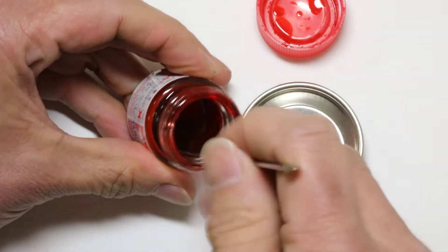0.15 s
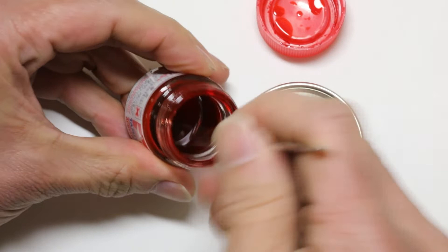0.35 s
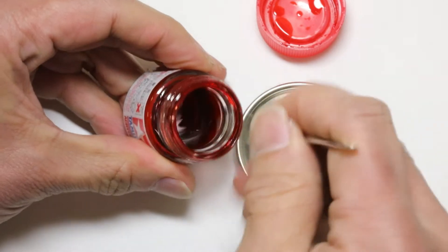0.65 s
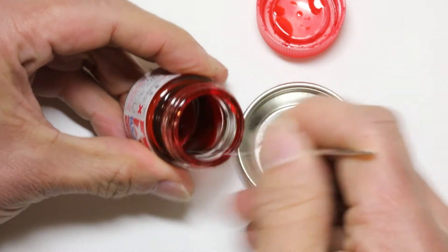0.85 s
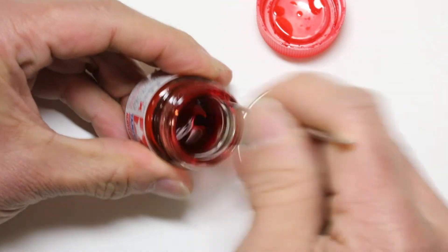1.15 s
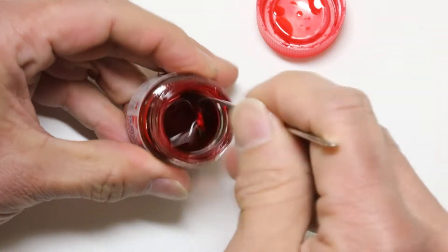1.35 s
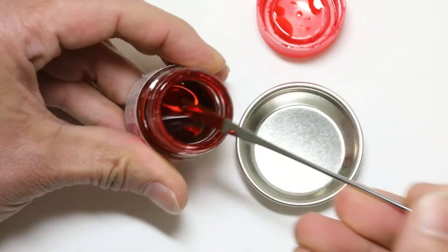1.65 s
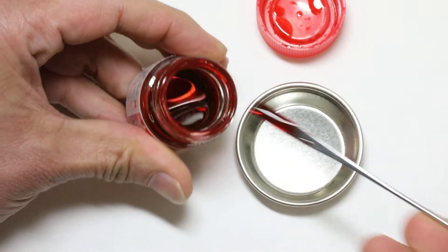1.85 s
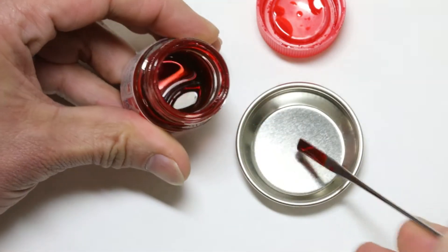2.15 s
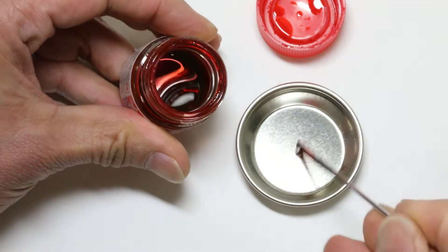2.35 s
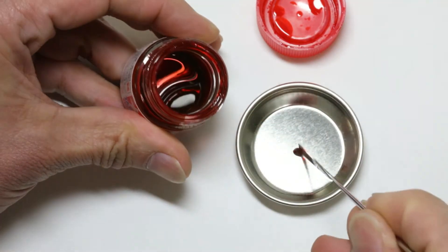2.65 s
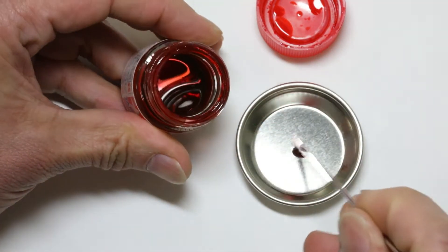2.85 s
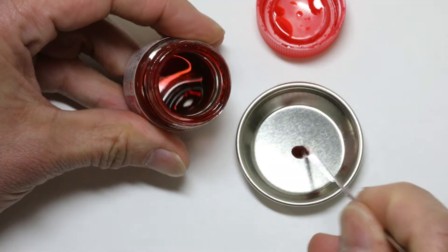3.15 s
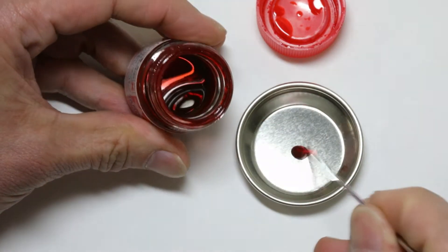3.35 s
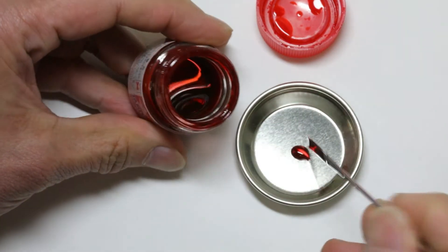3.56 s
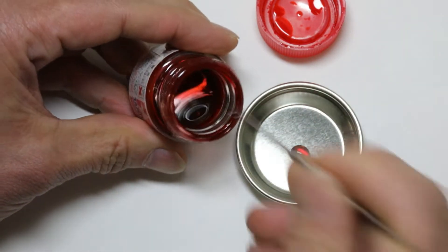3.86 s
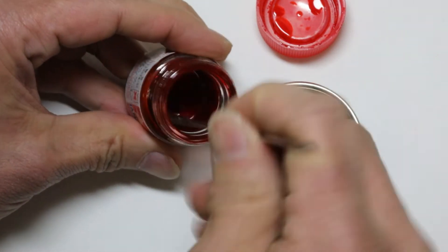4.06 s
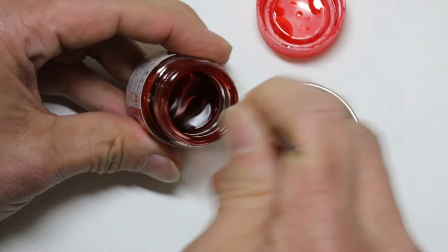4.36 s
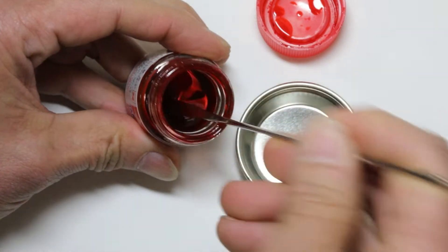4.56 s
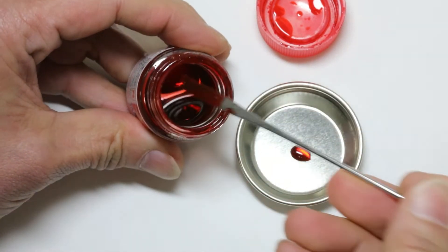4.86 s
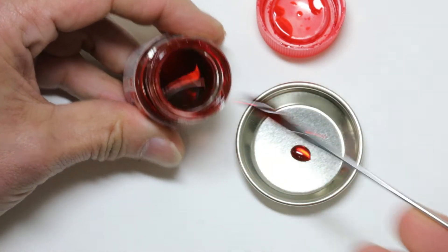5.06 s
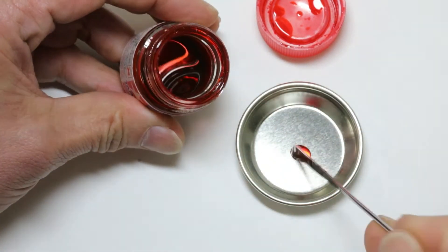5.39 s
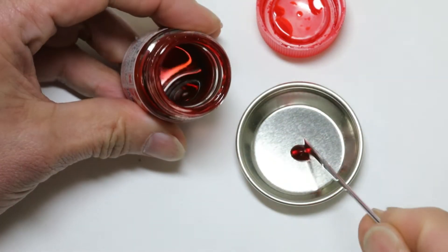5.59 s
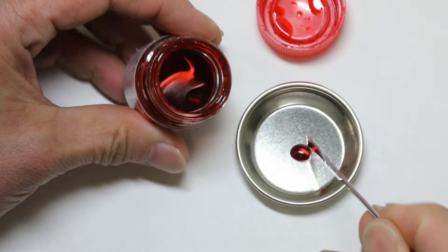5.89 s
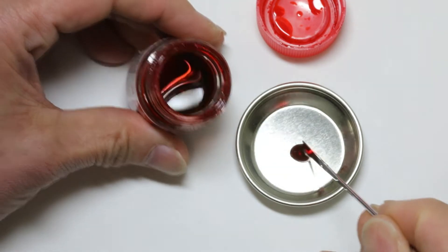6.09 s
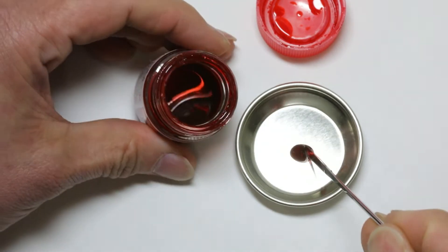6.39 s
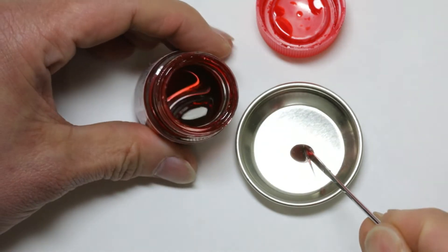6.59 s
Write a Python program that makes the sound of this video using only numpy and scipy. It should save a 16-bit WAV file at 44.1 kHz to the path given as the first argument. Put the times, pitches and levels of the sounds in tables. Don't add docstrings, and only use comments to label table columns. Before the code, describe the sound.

A small quiet room, close microphone, soft steady fan hum and faint hiss. From 0 to about 1.65 s a thin metal rod stirs paint in a small hand-held glass jar: quick irregular dull, hollow knocks mixed with tiny bright clicks on the glass edge, short gritty scrapes and a barely noticeable rising squeak near 0.45 s. A faint low rumble comes from the shaken table. A pause follows until 2.3 s, then the rod taps a tin dish roughly every 0.15 s until 3.5 s: sharp, dry, much louder clacks with very short metallic ring and slight table thump, the last ones ringing differently nearer the rim. From about 3.95 to 4.6 s a sparser, softer stir knocks in the jar. After a faint touch at 5.15 s, tin taps return from 5.4 to 6.15 s, with light wiping scrapes around 5.9 to 6.1 s and a last very faint tick near 6.4 s.

```python
import sys
import numpy as np
from scipy import signal
from scipy.fft import rfft, irfft
from scipy.io import wavfile

SR = 44100
rng = np.random.default_rng(int(sys.argv[2]) if len(sys.argv) > 2 else 0)


def output_pcm(signal):
    pcm = np.clip(np.atleast_2d(signal).T, -1, 1) * 32767
    wavfile.write(sys.argv[1], SR, np.round(pcm).astype(np.int16))


def volts_from_db(level):
    exponent = np.asarray(level, float) / 20
    return 10 ** exponent


N = 296793

# (frequency [Hz], level [dB], T60 [s])
CAVITY_MODES = [(1866, -10.5, 0.038), (1818, -14.5, 0.021), (1680, -8.5, 0.0078), (2410, -15.5, 0.016),
                (2800, -13.5, 0.0088)]
# (frequency [Hz], level [dB], T60 [s])
RIM_MODES = [(6580, -1.5, 0.012)]
# (frequency [Hz], level [dB], T60 [s])
SHOULDER_MODES = [(7600, -8.5, 0.013), (7910, -4, 0.0091)]


def jar():
    return knocks() + clicks() + glass_scrapes() + squeaks()


def knocks():
    # (time [s], cavity level [dB], glass edge re cavity [dB])
    knock_events = [(.0289, -25, -21), (0.0554, -32, -11), (0.1398, -26, -30), (0.1673, -37.5, -9),
                    (0.2117, -23, -31), (0.236, -37.5, -18), (.3184, -25, -31), (0.3894, -20.5, -30),
                    (0.5024, -16, -32), (0.5508, -33.5, -20), (0.5755, -27, -33), (.7706, -27.5, -24),
                    (0.8504, -25, -24), (.9268, -41, -12), (0.9483, -26, -20), (.963, -37.5, -10.5),
                    (1.0326, -31, -16), (1.065, -37, -13), (1.1519, -29, -18), (1.2506, -25, -26),
                    (1.2853, -38, -15), (1.3417, -31, -27), (1.5841, -25.5, -17), (3.9576, -38.5, -11.5),
                    (4.2347, -24.5, -23), (4.4432, -21.5, -21.5), (4.4885, -35.5, -16), (4.568, -25, -19.5)]
    wall_re_cavity_db, rim_re_edge_db, rod_re_edge_db = -13, -28, -4
    out = np.zeros(N)
    for s, cavity_db, edge_re_cavity_db in knock_events:
        edge_db = cavity_db + edge_re_cavity_db
        wall_db = cavity_db + wall_re_cavity_db
        add(out, s, tick(cavity_db, wall_db, edge_db + rim_re_edge_db, edge_db, edge_db + rod_re_edge_db))
    return out


def clicks():
    # (time [s], shoulder level [dB], then re shoulder: rod [dB], rim [dB], cavity [dB])
    click_events = [(.0138, -46.5, -12, -8, 4), (0.1298, -29.5, -2.5, -35, -7), (0.3087, -29, -5, -17, -8),
                    (0.343, -47.5, -5, -13, 11), (.407, -44, -5, -1, 11), (.479, -40.5, -1, -28, -1),
                    (0.667, -37, -5, 4, 8), (.7471, -49, -10, -9, 12), (.8433, -31.5, -4.5, -6, -4),
                    (1.2353, -41.5, -3, -9, -1), (1.4266, -46.5, -1, -7, 7), (1.494, -56, -1, -16, 14),
                    (1.5695, -30.5, -2.5, -6, 5.5), (1.609, -42, -11, -9, 5), (1.6387, -58, 8, 17.5, 3),
                    (4.0405, -43.5, 6.5, -15, 21), (4.1799, -41, -6, 20.5, 23),
                    (4.2068, -40.5, -4, -2, 10.5), (4.3801, -42, 7.5, 18.5, 16.5)]
    wall_db_offset = -4.5
    out = np.zeros(N)
    for s, db, rod_db, rim_db, cavity_db in click_events:
        wall_db = db + cavity_db / 2 + wall_db_offset
        add(out, s, tick(db + cavity_db, wall_db, db + rim_db, db, db + rod_db))
    return out


def tick(cavity_db, wall_db, rim_db, shoulder_db, rod_db):
    # (frequency [Hz], level [dB], T60 [s])
    rod_modes = [(11700, -16, .012), (13400, 1, .03)]
    cavity = ring(CAVITY_MODES, scatter_db=2.0, detune=0.007)
    wall = crack(4040, 4250, 0.026)
    rim = ring(RIM_MODES, detune=0.0059) + volts_from_db(-28) * crack(6160, 1200, 0.0063)
    shoulder = ring(SHOULDER_MODES, scatter_db=8.5, detune=0.014) + volts_from_db(0.5) * crack(6850, 2700, 0.015)
    rod = ring(rod_modes, scatter_db=3, detune=0.006) + volts_from_db(6.0) * crack(11900, 3600, 0.021)
    out = volts_from_db(cavity_db) * cavity + volts_from_db(wall_db + 3.5) * wall + volts_from_db(rim_db + 4.5) * rim
    return out + volts_from_db(shoulder_db + 3) * shoulder + volts_from_db(rod_db) * rod


def glass_scrapes():
    # (start [s], length [s], level [dB])
    wall_strokes = [
        (.442, 0.039, -52.5),
        (.905, 0.022, -48),
        (.996, 0.029, -48),
        (1.196, 0.038, -50),
        (1.396, .03, -50.5),
        (1.549, 0.012, -49),
        (1.575, 0.091, -57.5),
        (3.83, .08, -74),
        (4.19, 0.1, -61),
    ]
    # (start [s], length [s], level [dB])
    base_strokes = [
        (4.153, 0.049, -44.5),
    ]
    slips = drag(wall_strokes, rate_per_s=4000, scatter_db=2.5)
    body = volts_from_db(-9.0) * ring(CAVITY_MODES) + volts_from_db(-14) * ring(RIM_MODES) + volts_from_db(-11) * ring(SHOULDER_MODES)
    rung = signal.fftconvolve(slips, body / np.linalg.norm(body))[:N]
    wall = band(band(slips, 3300, 3200), 3300, 3200)
    base = band(band(drag(base_strokes, rate_per_s=3700, scatter_db=3.5), 1540, 2800), 1540, 2800)
    return volts_from_db(-4) * rung + volts_from_db(8) * wall + volts_from_db(15) * base


def squeaks():
    # (start [s], length [s], first pitch [Hz], last pitch [Hz], level [dB])
    squeak_events = [
        (0.436, 0.034, 1230, 1360, -53.5),
    ]
    overtones = zip((2, 3, 5, 6), (-2, -2, -11, -5.0))
    overtones = list(overtones)
    out = np.zeros(N)
    for s, long_s, first_hz, last_hz, db in squeak_events:
        share = np.linspace(0, 1, int(long_s * SR))
        phase = 2 * np.pi * np.cumsum(first_hz + (last_hz - first_hz) * share) / SR
        tones = sum(volts_from_db(tone_db) * np.sin(k * phase) for k, tone_db in overtones)
        add(out, s, volts_from_db(db) * np.sqrt(np.sin(np.pi * share).clip(0)) * tones)
    return out


def dish():
    # (time [s], level [dB], low ring re level [dB], spot [0 centre, 1 edge], clack [Hz])
    tap_events = [(2.336, -8.5, -15, 0.34, 4410), (2.4217, -24, -17.5, 0.15, 4450),
                  (2.5263, -5.5, -10.5, 0.18, 4410), (2.5789, -26.5, -14, -0.46, 4200),
                  (2.7021, -7.5, -9.5, 0.57, 4540), (2.8692, -4.5, -14.5, -0.22, 4230),
                  (3.0259, -4, -13, .2, 4360), (3.1923, -8, -7.5, 0.53, 4480), (3.3496, -8, -8, 0.74, 4520),
                  (3.4952, -9, -4, 1, 4550), (5.4245, -14.5, -15.5, 0.16, 4430),
                  (5.5854, -10.5, -13.5, 0.42, 4550), (5.7166, -8.5, -16.5, 0.079, 4500),
                  (5.8338, -5.5, -16, 0.088, 4530), (5.8832, -32, -32, -0.046, 4300),
                  (5.886, -27, -11.5, -0.33, 4300), (6.1458, -8, -9.5, 0.71, 4550),
                  (6.386, -43, -11, 0.77, 4100)]
    # (start [s], length [s], level [dB])
    dish_strokes = [
        (5.15, 0.091, -61),
        (5.9, 0.04, -47),
        (5.99, 0.068, -48.5),
        (6.068, 0.015, -48.5),
        (6.085, 0.057, -50),
    ]
    lag_s = -0.0003
    out = np.zeros(N)
    for s, main_db, low_re_main_db, spot, clack_hz in tap_events:
        add(out, s + lag_s, dish_tap(main_db, main_db + low_re_main_db, spot, clack_hz))
    slips = drag(dish_strokes, rate_per_s=7000, scatter_db=2.5)
    return out + 1.1 * band(slips, 3700, 2000) + 1.2 * band(band(slips, 6600, 3500), 5700, 3500)


def dish_tap(main_db, low_db, spot, clack_hz):
    # (frequency [Hz], level [dB], T60 [s])
    dish_modes = [(3990, -38, 0.09), (4220, -27, 0.033), (4420, -20.5, 0.054), (4674, -13, 0.039),
                  (4645, -13.5, 0.032), (5010, -26, 0.025), (5800, -39, 0.031)]
    # (frequency [Hz], level [dB], T60 [s])
    table_modes = [(480, 8.5, 0.016), (877, -11, 0.025)]
    tilt_db_per_khz = 11
    high_db = main_db - 29.5 + 17 * spot
    high_hz, low_hz = 8336 - 1310 * spot, 2830 - 480 * spot ** 4

    t = np.arange(4096) / SR
    press = (1 - np.exp(-t / 0.0001)) * (0.7 + 300 * t)
    contact = press / (1 + np.exp(np.minimum((t - 0.001) / 0.0001, 50)))
    clack = contact * np.sin(2 * np.pi * clack_hz * t)
    struck = [(hz, db + 1.5 - tilt_db_per_khz * abs(hz - clack_hz) / 1000, t60_s)
              for hz, db, t60_s in dish_modes]
    main = volts_from_db(1.0) * clack + ring(struck, scatter_db=0.5, detune=0.0056, rise_s=0.00067)
    main += volts_from_db(-19) * crack(clack_hz, 640, 0.034)
    middle = crack(6030, 1600, 0.0039)
    treble = crack(11740, 1500, 0.014) + volts_from_db(-10) * crack(15100, 900, 0.009)
    low = ring([(low_hz, 0, 0.02), (1.089 * low_hz, -5, 0.02)], rise_s=0.00095)
    low += volts_from_db(-8.5) * crack(2463, 578, 0.011)
    table = ring(table_modes, detune=0.0087, rise_s=0.0017) + volts_from_db(-8.5) * crack(865, 1020, 0.14)
    high = ring([(high_hz, 0, 0.014), (11200, -15, 0.015)]) + volts_from_db(-8.5) * crack(high_hz, 1100, 0.038)

    tap = volts_from_db(main_db) * main + volts_from_db((main_db + high_db) / 2 + 3.0) * middle + volts_from_db(main_db - 29.5) * treble
    return tap + volts_from_db(low_db + 4) * low + volts_from_db(low_db - 11.0) * table + volts_from_db(high_db + 6.0) * high


def ring(modes, scatter_db=0, detune=0, rise_s=0.0001):
    hz, db, t60_s = np.transpose(modes)[:, :, None]
    chance = rng.standard_normal((3, len(modes), 1))
    t = np.arange(4096) / SR
    fade = volts_from_db(db + scatter_db * chance[0] - 60 * t / t60_s)
    waves = np.sin(2 * np.pi * (hz * (1 + detune * chance[1]) * t + chance[2]))
    return (fade * waves).sum(axis=0) * (1 - np.exp(-t / rise_s)) ** 2


def crack(hz, width_hz, t60_s):
    t = np.arange(4096) / SR
    spit = rng.standard_normal(len(t)) * volts_from_db(-60 * t / t60_s)
    spit = band(band(spit, hz, width_hz), hz, width_hz)
    return spit / np.abs(spit).max()


def drag(strokes, rate_per_s, scatter_db):
    happens = rng.random(N) < rate_per_s / SR
    slips = happens * volts_from_db(scatter_db * rng.exponential(size=N)) * rng.choice([-1, 1], N)
    return level(slips, 0) * swells(strokes)


def swells(strokes):
    t = np.arange(N) / SR
    return sum(volts_from_db(db) * np.sin(np.pi * np.clip((t - s) / long_s, 0, 1)) for s, long_s, db in strokes)


def band(x, hz, width_hz):
    return signal.lfilter(*signal.iirpeak(hz, hz / width_hz, SR), x)


def level(x, db):
    return x * volts_from_db(db) / np.sqrt(np.mean(x ** 2))


def add(track, s, sound):
    i = int(s * SR)
    track[i:i + len(sound)] += sound[:N - i]


def room(x):
    # (delay [s], level [dB])
    near_echoes = [(.0024, -47), (.0044, -46), (.0055, -20)]
    # (delay [s], level [dB])
    wall_echoes = [(.0133, -29), (.0146, -27), (.0162, -28), (.0181, -30)]
    t60_s, treble_t60_s, treble_hz = 0.35, 0.3, 7800
    tail_db, side_db = -15.5, -76
    t = np.arange(SR // 2) / SR
    noise = rng.standard_normal((2, len(t)))
    dull = signal.sosfilt(signal.butter(2, treble_hz, fs=SR, output="sos"), noise)
    tail = dull * volts_from_db(-60 * t / t60_s) + (noise - dull) * volts_from_db(-60 * t / treble_t60_s)
    mid, side = tail * (1 - np.exp(-t / 0.0019)) * volts_from_db(tail_db) / np.linalg.norm(tail[0])
    mid[0] = 1
    for s, db in near_echoes + wall_echoes:
        add(mid, s, volts_from_db([db]))
    return np.array([signal.fftconvolve(x, mid + sign * volts_from_db(side_db) * side)[:N] for sign in (1, -1)])


def background():
    # (frequency [Hz], density [dB per Hz])
    hiss_spectrum = [(15, -15), (25, 2), (204, -3.5), (275, -5), (1100, -6), (1500, -8.5), (4170, -7.5),
                     (15600, -6.5)]
    hiss = level(coloured(hiss_spectrum), -61)
    return fan_hum() + table_shake() + hiss * np.array([[1], [-1]])


def fan_hum():
    # (frequency [Hz], density [dB per Hz])
    hum_spectrum = [(20, -21.5), (174, 1.5), (240, -3), (490, -6.5), (600, -9), (1200, -13.5), (1600, -18),
                    (15600, -26)]
    # (frequency [Hz], width [Hz], level [dB])
    hum_peaks = [(189, 41, -70), (343.3, 32, -60.5), (459, 22, -61), (1210, 14, -72)]
    hum = level(coloured(hum_spectrum), -53.5)
    for hz, width_hz, db in hum_peaks:
        hum += level(band(rng.standard_normal(N), hz, width_hz), db)
    return hum


def table_shake():
    # (start [s], length [s], level [dB])
    shake_events = [
        (0, .33, -64),
        (.35, 0.33, -60),
        (0.787, .95, -66),
        (3.04, 0.35, -67),
        (3.894, 0.53, -65),
        (4.413, 0.32, -60),
        (5.103, 0.41, -75),
    ]
    still_db = -80.5
    shake = level(band(band(rng.standard_normal(N), 70, 36.6), 70, 36.6), 0)
    return shake * (volts_from_db(still_db) + swells(shake_events))


def coloured(points):
    hz, db = np.transpose(points)
    axis_hz = np.maximum(np.arange(N // 2 + 1) * SR / N, 1)
    gain = volts_from_db(np.interp(np.log(axis_hz), np.log(hz), db))
    return irfft(rfft(rng.standard_normal(N)) * gain, N)


def scene():
    return room(jar() + dish()) + background()


def band_limit(x):
    return signal.sosfilt(signal.butter(12, 16960, fs=SR, output="sos"), x)


def record(dry):
    mix = signal.sosfilt(signal.cheby2(14, 36, 16000, fs=SR, output="sos"), dry)
    return band_limit(mix)


dry = scene()
out = record(dry)
output_pcm(out)
```